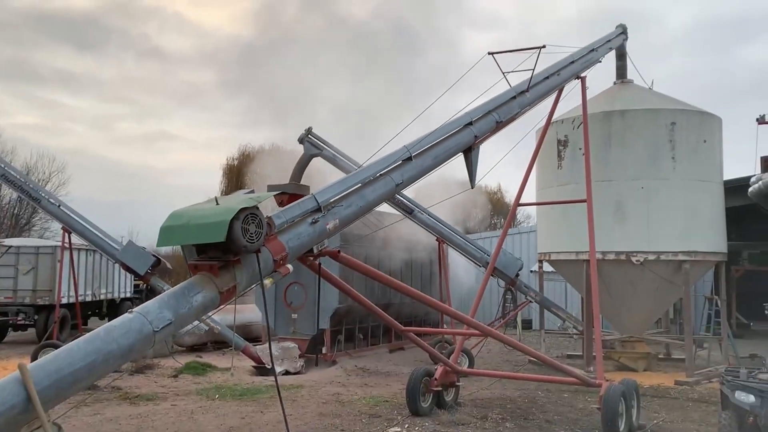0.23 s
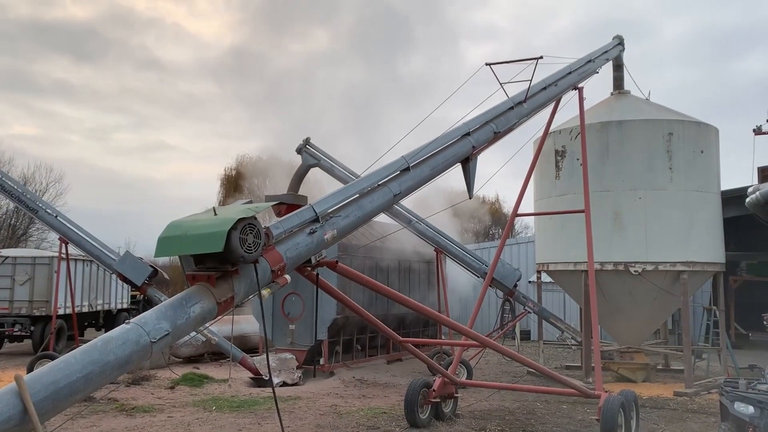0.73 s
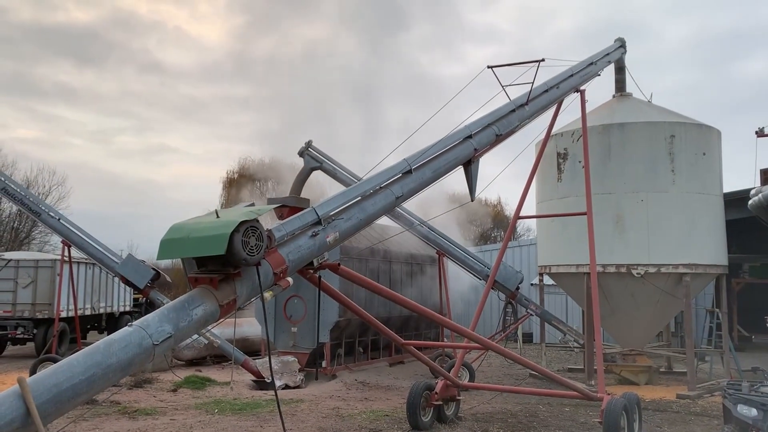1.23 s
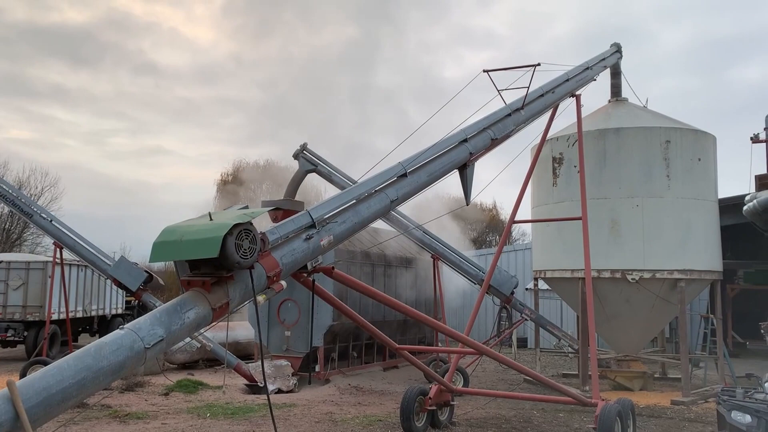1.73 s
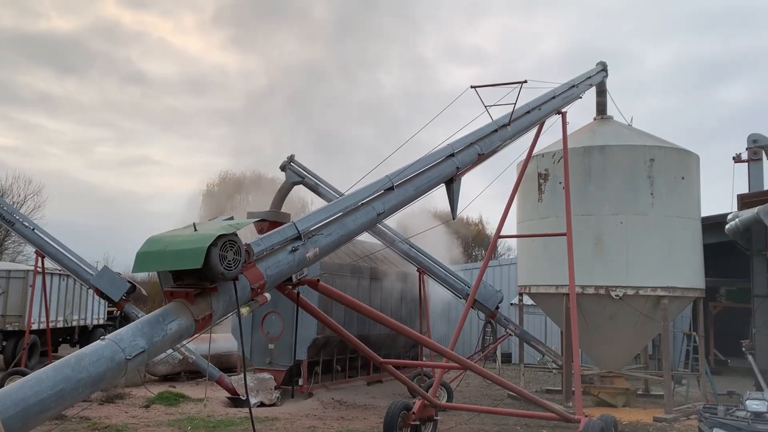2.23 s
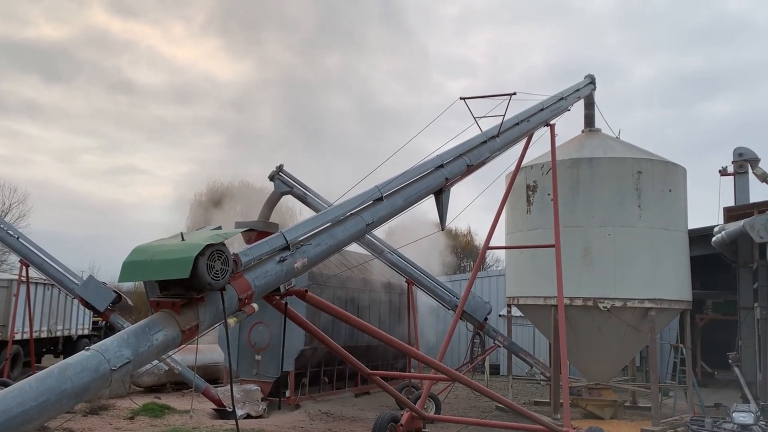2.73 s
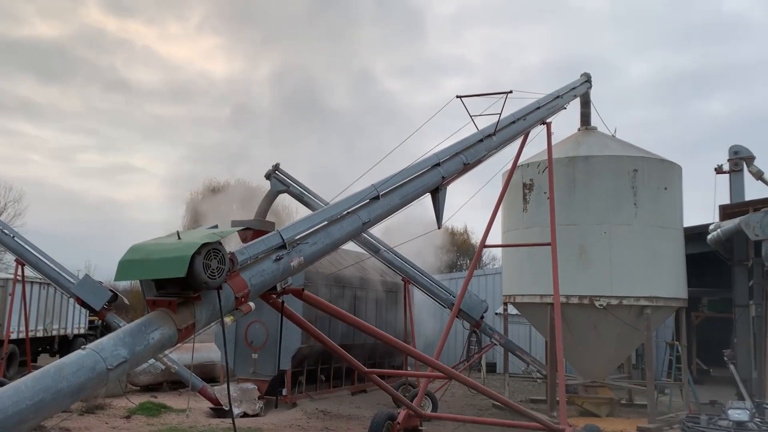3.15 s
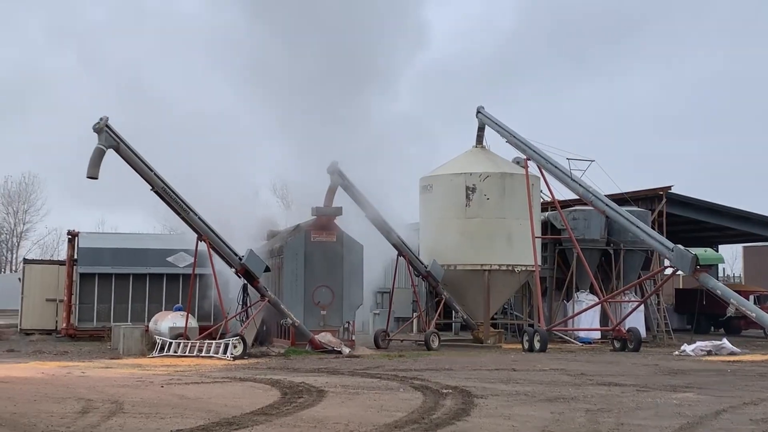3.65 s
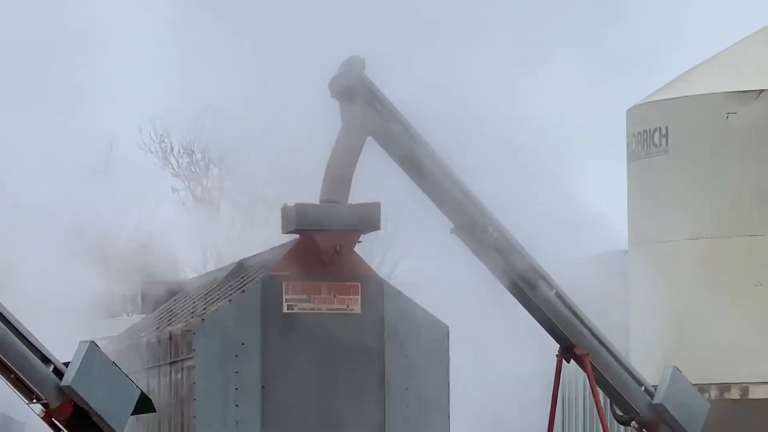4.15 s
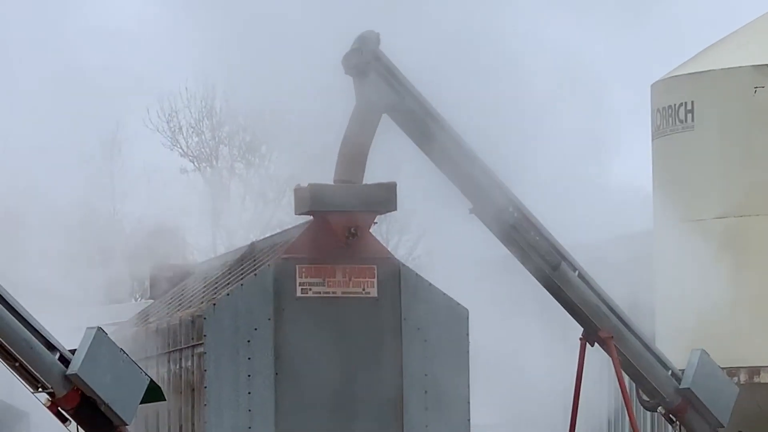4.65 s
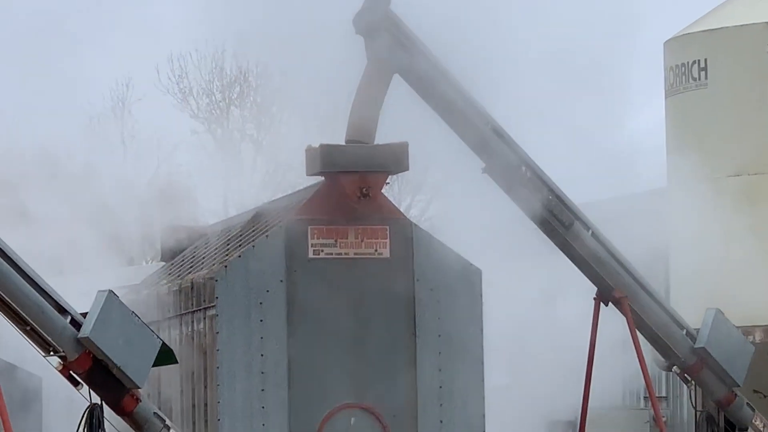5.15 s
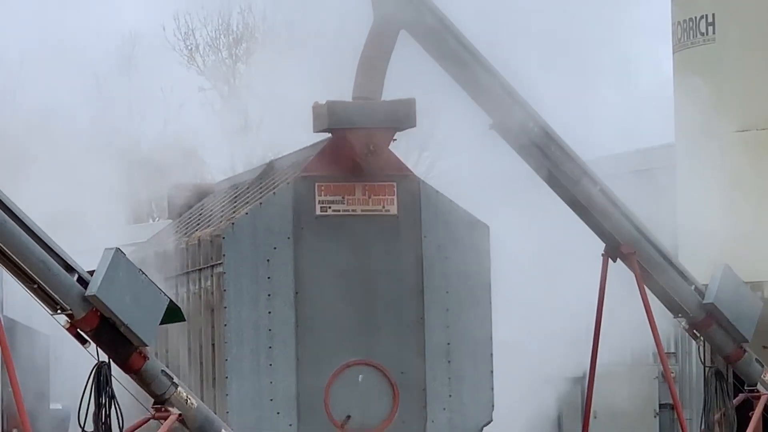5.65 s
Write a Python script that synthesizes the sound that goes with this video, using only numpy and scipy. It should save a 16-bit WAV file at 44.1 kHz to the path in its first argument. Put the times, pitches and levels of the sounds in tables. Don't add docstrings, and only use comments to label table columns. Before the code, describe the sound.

Steady farm machinery roar and dense hiss, cut suddenly to a darker, bassy, pulsing drone with a loud handling thump and small ticks.

```python
import sys
import numpy as np
from scipy import signal
from scipy.io import wavfile
from scipy.ndimage import uniform_filter1d

SR = 44100
rng = np.random.default_rng(int(sys.argv[2]) if len(sys.argv) > 2 else 0)


def inscribe(sig):
    pcm = np.round(np.clip(np.atleast_2d(sig).T, -1, 1) * 32767)
    wavfile.write(sys.argv[1], SR, pcm.astype(np.int16))


def voltage_ratio(decibels):
    exponent = np.asarray(decibels, float) / 20
    return 10 ** exponent


N = 259749
CUT_S, CUT_FADE_S = 3.353, 0.0017


# (frequency [Hz], level [dB per Hz])
ROAR_NEAR = [(30, -70), (40, -59), (52, -40.5), (70, -53), (100, -39.5), (150, -45.5), (200, -41.5),
             (260, -44.5), (300, -47.5), (430, -51), (550, -45), (700, -46), (850, -52.5), (1000, -55.5)]
ROAR_FAR = [(30, -66.5), (40, -59), (52, -42.5), (70, -35.5), (100, -38), (150, -36.5), (200, -46),
            (260, -45.5), (300, -47.5), (430, -48), (550, -49), (700, -52), (850, -56), (1000, -62.5)]
# (frequency [Hz], width [Hz], level [dB])
PANELS_NEAR = [(85.5, 8.9, 11.5), (120, 22, 16), (140.7, 67, 12.5), (159, 4.2, 6), (214, 10, 15.5),
               (242.6, 24, 14), (332, 18, 4.5), (540, 34, 1.5), (690, 21, 7.5), (763, 36, 4)]
PANELS_FAR = [(64, 8.2, -2), (115, 13, 1.5), (217.6, 5.6, 17), (248.5, 29, 11.5), (425, 14, -5),
              (515, 31, -8), (584, 25, 3.5), (625, 31, -2.5), (740, 41, 7)]


def roar(base, panels, ports):
    def colour_db(hz):
        bumps = sum(db * np.exp(-(2 * (hz - f) / width) ** 2) for f, width, db in panels)
        band = np.clip((1100 - hz) / 200, 1e-9, 1) * (hz > 22)
        return read(base, hz) + bumps + 10 * np.log10(band + 1e-9)
    return field(colour_db, ports, patchy_db=1.2, swell_db=.4, ripple_db=.8, sway=0, size=8192)


# (low edge [Hz], high edge [Hz])
PANEL_GROUPS = [(100, 160), (160, 195), (195, 270)]
# (near level [dB], far level [dB], flutter [dB])
PANEL_REST = [(-24.5, -18.5, 2.5), (-25.5, -24.5, 0), (-21.5, -20.5, 2.5)]
# (time [s], peak level [dB], length [s])
SIDE_SURGES = [(0.37, -14.2, 0.035), (0.737, -14.5, 0.046), (1.272, -20.5, 0.05), (1.694, -22, 0.037),
               (2.07, -16, 0.037), (2.225, -17, 0.039), (2.303, -18.5, 0.054), (3.02, -20, 0.042),
               (3.56, -23, 0.045), (4.177, -13.8, 0.062), (4.98, -12.9, 0.038), (5.33, -12.5, 0.04),
               (5.546, -13.0, 0.045), (5.796, -14.5, 0.078)]
END_SURGES = [
    (0.07, -20, 0.036),
    (0.144, -17.5, 0.049),
    (0.725, -20, 0.038),
    (1.12, -20.4, 0.036),
    (2.167, -22, 0.081),
    (2.436, -21, 0.037),
    (2.543, -18.5, 0.023),
    (3.96, -16, 0.021),
    (5.267, -16, 0.044),
    (5.438, -17.5, 0.077),
]
COVER_SURGES = [(0.262, -15.5, 0.027), (0.513, -12, 0.036), (0.661, -16, 0.089), (1.368, -14.5, 0.032),
                (1.643, -15.5, 0.029), (2.25, -13, 0.038), (2.729, -14, 0.052), (2.804, -17.5, 0.035),
                (3.34, -20.5, 0.035), (3.567, -14, 0.036), (3.982, -15.5, 0.02), (4.6, -15, 0.044),
                (4.767, -10.5, 0.016), (5.315, -15, 0.022)]


def housing(x):
    surges = (SIDE_SURGES, END_SURGES, COVER_SURGES)
    for edges_hz, rows, (*rest_db, flutter_db) in zip(PANEL_GROUPS, surges, PANEL_REST):
        sos = signal.butter(2, edges_hz, "band", fs=SR, output="sos")
        band = signal.sosfiltfilt(sos, x)
        power = uniform_filter1d(band.mean(0) ** 2, size=2400) + 1e-9
        x = x - band + band * surging(rows, rest_db, flutter_db) / np.sqrt(power)
    return x


# (frequency [Hz], level [dB per Hz])
HISS_NEAR = [(900, -49), (1300, -58), (1800, -59.5), (2400, -61), (3300, -62.5), (4500, -60.5),
             (5500, -59.5), (6500, -58), (7800, -61), (9300, -61), (11000, -61.5), (13000, -66.5),
             (14500, -69.5), (15500, -72)]
HISS_FAR = [(900, -62), (1300, -67), (1800, -72), (2400, -71.5), (3300, -77.5), (4500, -82), (5500, -84.5),
            (6500, -87), (7800, -91), (9300, -91.5), (11000, -93.5), (13000, -98), (14500, -102.5),
            (15500, -110.9)]


def hiss(base, ports, patchy_db, swell_db):
    def colour_db(hz):
        band = np.clip((hz - 900) / 200, 1e-9, 1) * (hz < 15650)
        return read(base, hz) + 10 * np.log10(band + 1e-9)
    return field(colour_db, ports, patchy_db, swell_db, ripple_db=1.3, sway=0.27, size=1024)


# (time [s], peak level [dB], length [s], pitch [Hz])
KICKS = [(3.382, -11, 0.031, 86), (3.502, -12.5, 0.072, 82.3), (3.812, -9, 0.085, 84.1),
         (3.984, -12.5, 0.044, 86.3), (4.29, -13.1, 0.056, 86.8), (4.45, -12.5, 0.054, 83.7),
         (4.533, -14.5, 0.051, 85.3), (4.708, -19, 0.11, 80.9), (4.894, -17, 0.064, 84.3),
         (5.026, -13.5, 0.087, 83.3), (5.417, -19, 0.046, 91.5), (5.551, -17.5, 0.041, 88.7),
         (5.698, -12, 0.037, 87.7)]


def boom():
    s, _, _, hz = np.transpose(KICKS)
    turns = np.cumsum(np.interp(np.arange(N) / SR, s, hz)) / SR
    gain = surging(KICKS, rest_db=[-28, -28], flutter_db=-0.5)
    return np.sqrt(2) * gain * np.sin(2 * np.pi * turns)


# (frequency [Hz], level [dB rms], wander [Hz], wobble [dB], left-right [dB])
TONES_NEAR = [(67.8, -21, .1, .7, .2), (176.2, -32, .3, 2.5, .3), (818.6, -29, .35, .8, 3.5),
              (910, -46, .4, 1.5, 2.5)]
TONES_FAR = [(179.8, -17.5, 0.38, 4.3, .2), (349, -35, 0.63, 0.93, .2)]


def tones(rows):
    t, out = np.arange(N) / SR, np.zeros((2, N))
    coarse = t[::256]
    for hz, db, wander_hz, wobble_db, pan_db in rows:
        pitch = hz + wander_hz * np.interp(t, coarse, drift(coarse, 3.72))
        level = voltage_ratio(db + wobble_db * np.interp(t, coarse, drift(coarse, 5.1)))
        line = np.sqrt(2) * level * np.sin(2 * np.pi * np.cumsum(pitch) / SR)
        out += line * voltage_ratio(np.array([[.5], [-.5]]) * pan_db)
    return out


# (time [s], peak level [dB], start [Hz], end [Hz], length [s],
# phase of each port off the middle at the start [rad])
KNOCKS = [
    (3.6276, 6.5, 650, 80, .021, .62),
    (3.9025, -13, 1300, 450, 0.0053, 0.65),
    (4.7155, -15, 1100, 500, .005, 0.8),
]


def knocks():
    out = np.zeros((2, N))
    for s, db, start_hz, end_hz, length, lag in KNOCKS:
        u = np.arange(round(length * SR)) / (length * SR)
        hz = end_hz + (start_hz - end_hz) * np.exp(-5.5 * u)
        phase = 2 * np.pi * (np.cumsum(hz) / SR - .25)
        ring = -np.sin(phase - lag * (hz / start_hz) ** 0.33 * np.array([[1], [-1]]))
        envelope = np.minimum(u / .14, 1) * (1 - u) ** 1.2
        out[:, round(s * SR):][:, :len(u)] += voltage_ratio(db) * ring * envelope
    return out


# (time [s], level [dB], left-right [dB])
TICKS = [
    (3.6282, -41, -10),
    (3.9013, -31, -10),
    (4.7143, -27.5, 0),
]


def ticks():
    out = np.zeros((2, N))
    for s, db, pan_db in TICKS:
        noise = signal.lfilter([1, 1], [1, -.8], rng.standard_normal(60))
        click = voltage_ratio(db) * evened(noise) * np.hanning(60)
        pair = np.array([click, np.roll(click, shift=5)])
        out[:, round(s * SR):][:, :60] += pair * voltage_ratio(np.array([[.5], [-.5]]) * pan_db)
    return out


# (frequency [Hz], likeness [0-1], left lead [rad], left-right [dB])
PORTS_NEAR = [(150, .988, 0, .2), (330, .9, .2, .5), (650, .8, .45, 4), (1200, .5, .9, 1.5),
              (1850, .12, 2.7, -2), (2400, .5, 6.1, -1), (2750, .35, 8.2, -1.2), (3250, .78, 9.42, -1.1),
              (3750, .3, 10.6, -2), (4350, .72, 12.6, -2), (5250, .08, 13.5, -6), (5750, .4, 16.4, -5.5),
              (6400, .15, 16.9, -4), (7400, .8, 15.6, .3)]
PORTS_FAR = [(160, .992, 6.28, .2), (500, .9, 6.28, .3), (900, .85, 6.08, 1), (1200, .55, 5.9, 3),
             (1600, .15, 3.8, 0), (2300, .84, 5.3, -2.5), (3000, .55, 7.3, -3.5), (3500, .75, 8.6, -2.5),
             (4000, .5, 7.5, -5), (4500, .08, 8.8, -6), (5800, .58, 10.7, -6), (6800, .1, 11.8, .5),
             (7500, .65, 14.8, 0)]
# (frequency [Hz], likeness [0-1], left lead [half turns])
PORTS_TREBLE = [(8200, .78, 4.55), (8900, .96, 4.12), (9300, .99, 4), (9850, .96, 3.92), (10300, .72, 3.6),
                (11050, .98, 3.06), (12250, .985, 2.97), (12800, .6, 2.4), (13300, .98, 2.05),
                (14600, .97, 1.95), (15050, .85, 1.7), (15350, .96, 1.08)]


def field(colour_db, ports, patchy_db, swell_db, ripple_db, sway, size):
    frame = dict(fs=SR, nperseg=size, noverlap=size * 3 // 4)
    hz, t, (one, other) = signal.stft(rng.standard_normal((2, N)), **frame)
    blurred = uniform_filter1d(rng.standard_normal((2, *one.shape)), size=14, axis=1)
    patches, wander = evened(uniform_filter1d(blurred, size=6, axis=2))
    ripple = rng.standard_normal(len(hz))
    ripple = evened(uniform_filter1d(ripple, size=2) - uniform_filter1d(ripple, size=5))
    level_db = (colour_db(hz) + ripple_db * ripple)[:, None]
    gain = voltage_ratio(level_db + patchy_db * patches + swell_db * drift(t, 11.0)) * np.sqrt(SR / 2)
    treble = [(f, like, np.pi * turns, 0) for f, like, turns in PORTS_TREBLE]
    f, like, lead, balance_db = np.transpose(list(ports) + treble)
    like = np.clip(np.interp(hz, f, like), 0, 1)[:, None]
    lead = np.interp(hz, f, lead)[:, None] + sway * wander
    tilt = voltage_ratio(np.interp(hz, f, balance_db))[:, None]
    left = tilt * np.exp(1j * lead) * (like * one + np.sqrt(1 - like ** 2) * other)
    z = np.array([left, one]) * gain * np.sqrt(2 / (1 + tilt ** 2))
    return signal.istft(z, **frame)[1][:, :N]


def surging(rows, rest_db, flutter_db):
    t = np.arange(0, N + 256, 256) / SR
    s, db, length = np.transpose(rows)[:3]
    bells = np.exp(-np.log(2) * (2 * (t[:, None] - s) / length) ** 2)
    flutter = drift(t, top_hz=14)
    flutter = evened(flutter - uniform_filter1d(flutter, size=40))
    rest = voltage_ratio(np.where(t < CUT_S, *rest_db) + flutter_db * flutter)
    power = rest ** 2 * (1 - bells.max(1)) + bells @ voltage_ratio(db) ** 2
    return np.interp(np.arange(N) / SR, t, np.sqrt(power))


def drift(t, top_hz):
    hz = np.geomspace(.2, top_hz, num=24)
    return evened(np.sin(2 * np.pi * (hz * t[:, None] + rng.random(len(hz)))) @ hz ** -.5)


def evened(x):
    return x / np.sqrt(np.mean(x ** 2) + 1e-20)


def read(points, hz):
    f, value = np.transpose(points)
    return np.interp(np.log(hz + 1), np.log(f + 1), value)


def scene():
    near = roar(ROAR_NEAR, PANELS_NEAR, PORTS_NEAR) + tones(TONES_NEAR)
    near += hiss(HISS_NEAR, PORTS_NEAR, patchy_db=1.48, swell_db=0.0)
    far = roar(ROAR_FAR, PANELS_FAR, PORTS_FAR) + tones(TONES_FAR) + boom()
    far += hiss(HISS_FAR, PORTS_FAR, patchy_db=1.13, swell_db=-0.3)
    t = np.arange(N) / SR
    ramp = (t - CUT_S) / CUT_FADE_S
    yard = housing(near * np.clip(-ramp, 0, 1) + far * np.clip(ramp, 0, 1))
    duck_db, duck_s = -12, .012
    duck = voltage_ratio(duck_db * np.exp(-((t - KNOCKS[0][0] - duck_s / 2) / duck_s) ** 4))
    bass = signal.filtfilt(*signal.butter(2, 400, fs=SR), yard)
    return yard - (1 - duck) * bass + knocks() + ticks()


def low_pass(x):
    return signal.sosfilt(signal.butter(12, 15650, fs=SR, output="sos"), x)


def record(dry):
    mix = np.clip(dry, -1, 1)
    return low_pass(mix)


dry = scene()
out = record(dry)
inscribe(out)
```